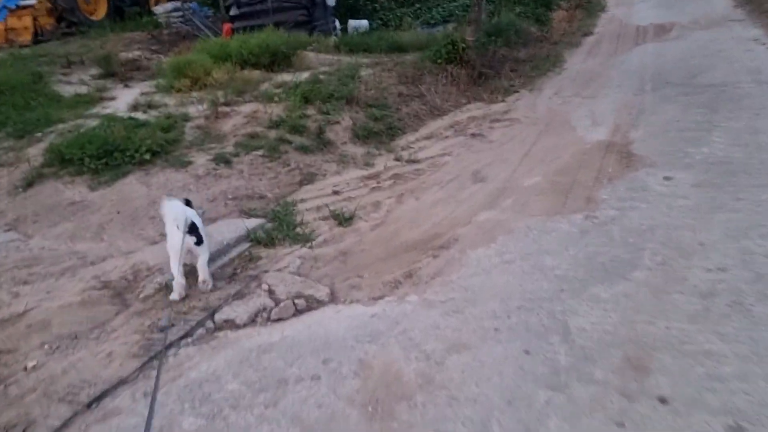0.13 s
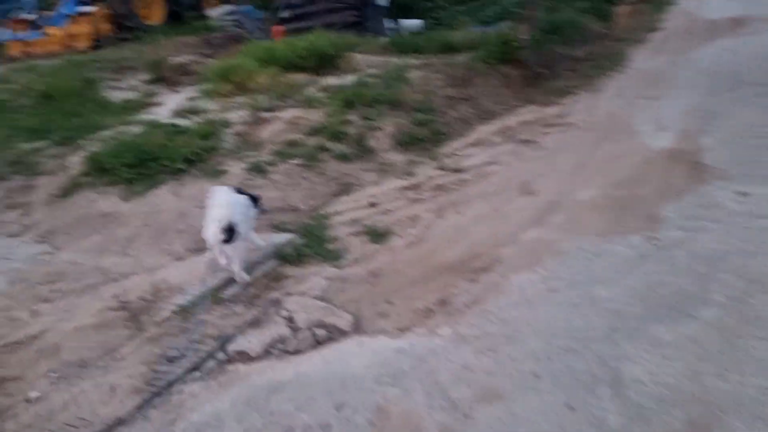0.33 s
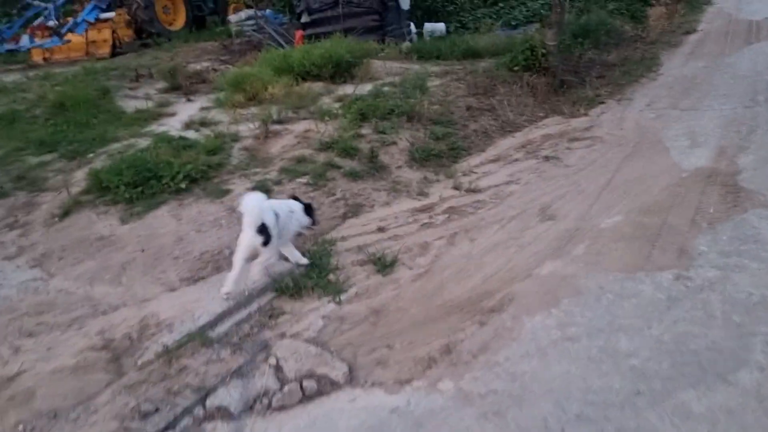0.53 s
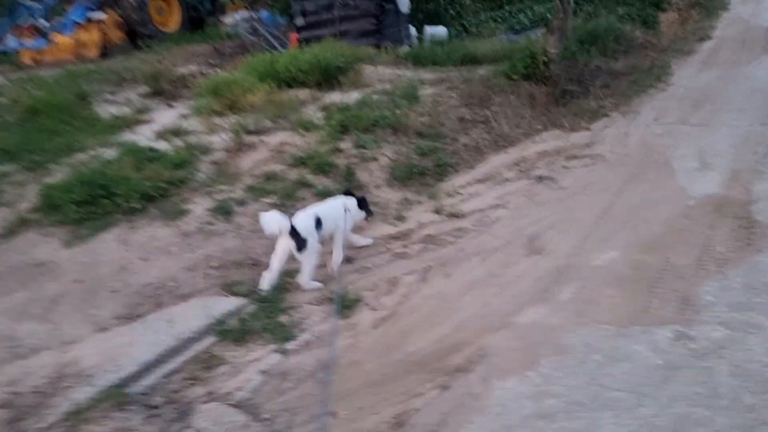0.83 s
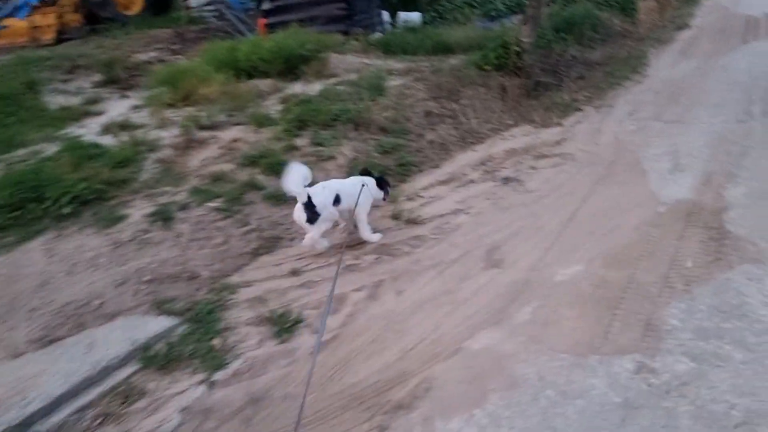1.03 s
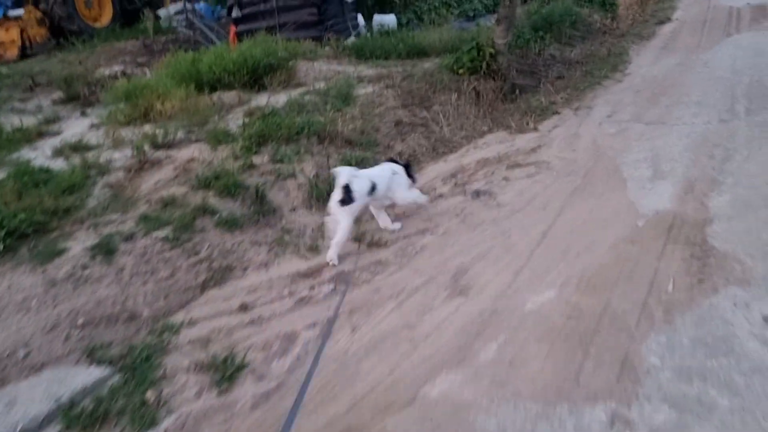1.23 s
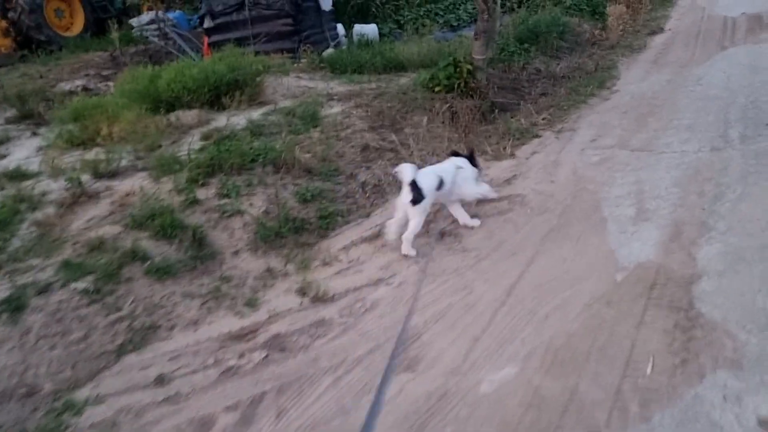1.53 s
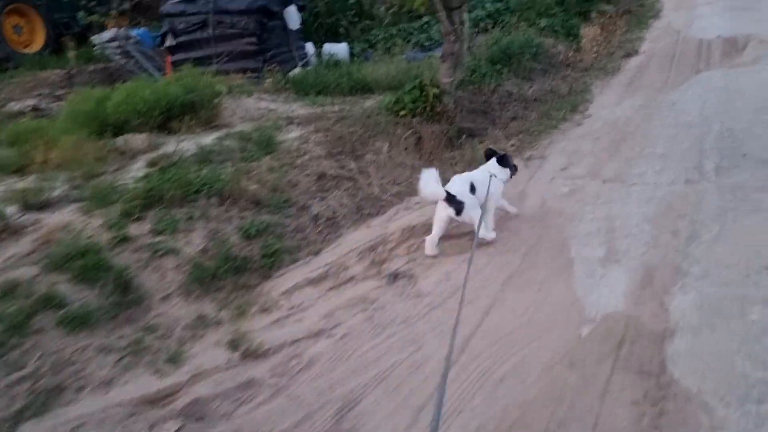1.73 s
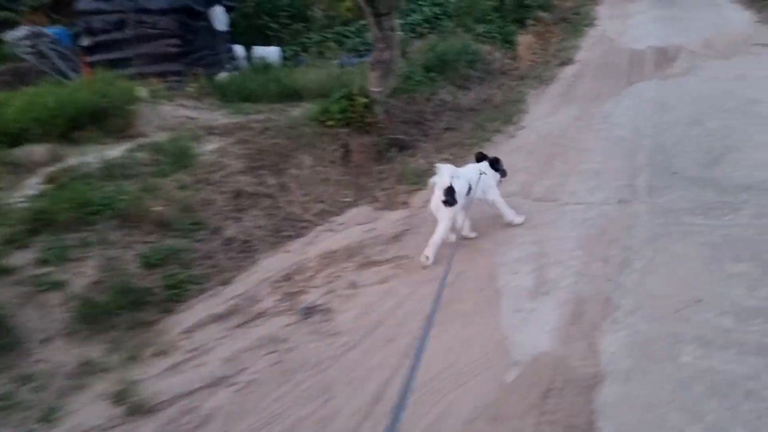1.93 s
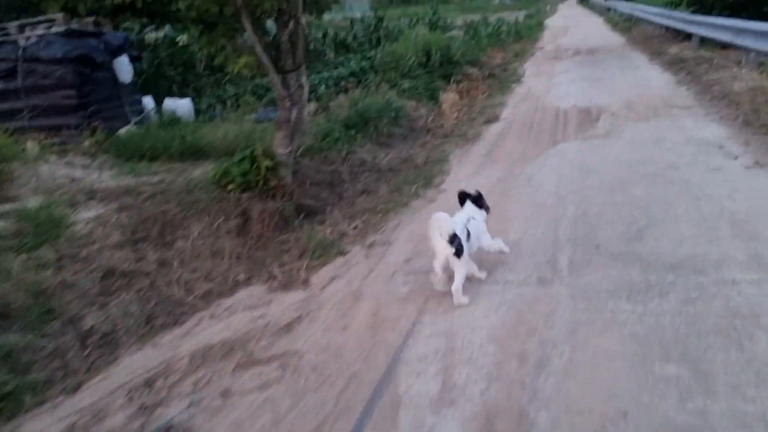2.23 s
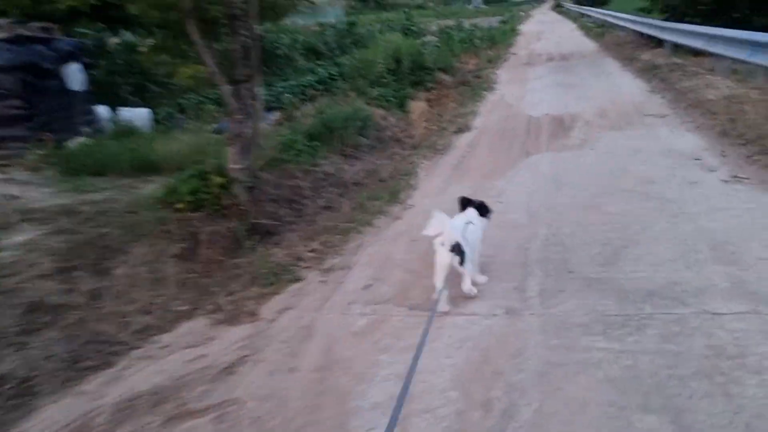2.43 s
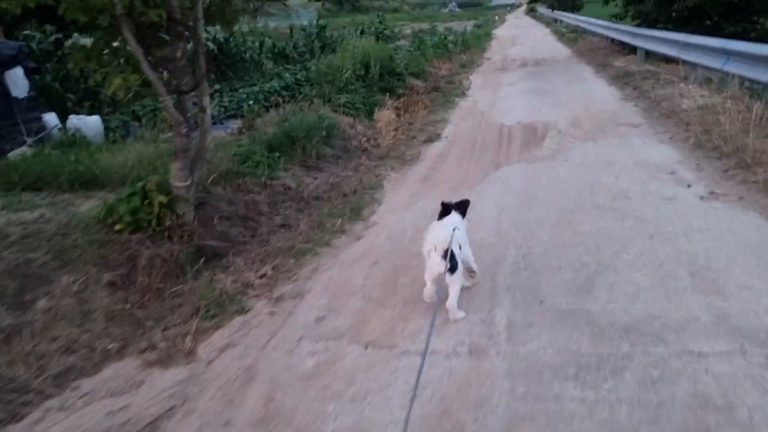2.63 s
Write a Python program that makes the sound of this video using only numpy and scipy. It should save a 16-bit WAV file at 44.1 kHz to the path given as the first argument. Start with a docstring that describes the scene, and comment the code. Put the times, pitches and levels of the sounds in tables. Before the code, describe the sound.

Loose sandals slap and scuff on a sandy concrete lane while a leash clip clicks and jingles

```python
"""Loose sandals slap and scuff along a sandy concrete lane, on a walk with a small dog.
Each slap is a noisy contact filtered into hollow, knock, crack, snap and fizz; grit cracks under the soles.
The leash's metal clip clicks, chatters and rattles through decaying modes, with one faint lower ring.
Close steps and clicks scatter briefly; wind rumbles on the microphone's two ports over a quiet outdoor hush."""
import sys
import numpy as np
from scipy import signal
from scipy.fft import rfft, irfft
from scipy.io import wavfile
from scipy.ndimage import uniform_filter1d

SR = 44100
rng = np.random.default_rng(int(sys.argv[2]) if len(sys.argv) > 2 else 0)


def dump(signal):
    """Clip the signal to [-1, 1] and save it as 16-bit WAV at the path in sys.argv[1]."""
    limited = np.clip(np.atleast_2d(signal).T, -1, 1)
    pcm = np.round(limited * 32767).astype(np.int16)
    wavfile.write(sys.argv[1], SR, pcm)


N = 121275
T = np.arange(N) / SR
HIT_T = T[:SR // 25]  # 40 ms, room for one contact
RING_T = T[:SR // 4]  # 250 ms, room for one ring

# leash clip clicks: t/s, level/dB in each of the four click bands (low to high), ring level/dB before trim
CLIP_CLICKS = [(0.182, -80, -51.5, -71, -58.5, -59.5), (0.2029, -43, -37, -42, -52, -66),
               (0.5057, -48, -40.5, -33.5, -69, -51), (0.6968, -62, -84, -44, -60, -65),
               (0.7055, -63, -67, -49.5, -62, -80), (1.219, -43.5, -41.5, -42, -42.5, -64),
               (1.2975, -53, -48, -39.5, -52, -53.5), (1.3028, -61, -52, -47.5, -46, -48),
               (1.4683, -51, -76, -41.5, -56, -55), (1.8703, -78, -77, -53, -51.5, -55.5),
               (1.883, -58, -54, -55, -49.5, -85), (2.2554, -57, -44, -67, -57, -55.5),
               (2.2747, -56, -48.5, -48.5, -52, -65), (2.4495, -44, -43, -35.5, -49.5, -59),
               (2.6451, -65, -80, -52.5, -59, -71)]

CLICK_RISE_S = 0.0003
GRIT_DECAY_S, GRIT_SPREAD = 0.001, 1.4
GRIT_LAG_S = -0.00007  # negative: the right port hears it first


def undb(db):
    """Decibels to gain."""
    return 10 ** (np.asarray(db) / 20)


def unit(x):
    """Scale each channel to rms 1."""
    return x / np.sqrt(np.mean(x ** 2, axis=-1, keepdims=True) + 1e-20)


def band(x, lo_hz, hi_hz, order=2):
    """Causal band-pass."""
    top_hz = min(max(hi_hz, lo_hz + 20), SR / 2 - 1000)
    sos = signal.butter(order, [lo_hz, top_hz], "band", fs=SR, output="sos")
    return signal.sosfilt(sos, x)


def colour(x, points):
    """Shape a full-length signal's spectrum by (f/Hz, level/dB) points, at rms 1."""
    hz, db = np.array(points, float).T
    log_hz = np.log(np.fft.rfftfreq(N, 1 / SR) + 1)
    gain = undb(np.interp(log_hz, np.log(hz), db))
    return unit(irfft(rfft(x) * gain, N))


def walk(rate):
    """Smooth random wander, spread near 1, with this many new values a second."""
    k = int(SR / rate)
    steps = np.repeat(rng.standard_normal(N // k + 1), k)
    return unit(uniform_filter1d(steps, k)[:N])


def pan(db):
    """Left and right gains for a left minus right level difference."""
    gains = undb(np.array([[db], [-db]]) / 2)
    return gains / np.sqrt(np.mean(gains ** 2))


def add(out, start, sound, lag):
    """Mix in a stereo sound that reaches the right port later by lag seconds."""
    for channel in range(2):
        i = max(int(start * SR) + channel * int(round(lag * SR)), 0)
        part = sound[channel, :max(N - i, 0)]
        out[channel, i:i + len(part)] += part


def swell(start, length, attack):
    """A straight rise and fall; attack is the rising share of the length."""
    return np.interp((T - start) / length, [0, np.clip(attack, 0.02, 0.9), 1], [0, np.sqrt(2), 0])


def at_level(x, db):
    """Set a 40 ms contact's energy to that of 10 ms at this rms level."""
    return unit(x) * undb(db) / 2


def contact(decay, spread, own, rise):
    """Surfaces close in a short crumple with one sharp peak, partly different at each port."""
    noise = rng.standard_normal((3, len(HIT_T)))
    envelope = np.exp(-HIT_T / decay) * (1 - np.exp(-HIT_T / rise))
    push = (noise[0] + own * noise[1:]) * envelope
    # spread sizes the crumple against the peak of 1
    push *= spread / np.sqrt(np.sum(push ** 2, axis=1, keepdims=True))
    push[:, int(rise * SR)] += 1
    return push


def sandals():
    """Each slap rings the air pocket under the heel and cracks in the rubber above it."""
    # sandal slaps: t/s, hollow f/Hz, crack f/Hz, then hollow, knock, crack, snap, fizz level/dB
    slaps = [(0.236, 727, 2700, -23, -19, -21, -22.5, -38),
             (0.7559, 552, 2730, -29.5, -33, -35, -38, -44.5),
             (1.0777, 780, 3280, -34, -33, -33.5, -40.5, -46), (1.2911, 525, 2790, -43, -39, -39, -51, -56),
             (1.6651, 546, 2590, -33, -37, -30, -37, -45), (1.9851, 824, 3400, -28.5, -35, -28, -30, -43.5),
             (2.4181, 560, 2700, -32, -35, -35, -40.5, -56.5)]
    # left minus right of those five parts: level/dB
    slap_pan_db = [3, -3, 7, -4, 1]
    out = np.zeros((2, N))
    for start, hollow_hz, crack_hz, *levels in slaps:
        push = contact(decay=0.0026, spread=1.38, own=0.97, rise=0.0005)
        pocket = band(push, hollow_hz * 0.83, hollow_hz * 1.174, order=1)
        hollow = band(pocket, hollow_hz * 0.63, hollow_hz * 1.75)
        knock = band(push, 950, 1800)
        crack = band(push, crack_hz * 0.84, crack_hz * 1.15, order=3)
        snap = band(push, 3700, 5900, order=3)
        fizz = band(push, 6300, 12500)
        parts = [hollow, knock, crack, snap, fizz]
        for part, db, side_db in zip(parts, levels, slap_pan_db):
            add(out, start, at_level(part, db) * pan(side_db), lag=0.00022)
    return out


def grains(rate, scatter_db, own):
    """Random tiny impacts of scattered size, partly different at each port."""
    size_db = scatter_db * np.minimum(rng.exponential(size=N), 4)
    hits = (rng.random(N) < rate / SR) * undb(size_db)
    chance = rng.standard_normal((3, N))
    return hits * (np.sign(chance[0]) + own * chance[1:])


def sand_grains(rate, scatter_db, own):
    """Grains of four sizes, each size crumpling briefly in its own band."""
    # grain sizes, coarse to fine: low f/Hz, high f/Hz
    grain_bands = [(300, 1800), (1800, 3600), (3600, 7000), (7000, 16000)]
    # tone of the sand: f/Hz, level/dB
    sand_colour = [(300, -18), (900, 6), (1500, 8), (2800, 6), (5500, -2), (8000, -0.5), (11000, -31),
                   (15500, -24)]
    sand = np.zeros((2, N))
    for lo, hi in grain_bands:
        impacts = grains(rate, scatter_db, own)
        crumple = contact(GRIT_DECAY_S, GRIT_SPREAD, own, CLICK_RISE_S)
        crackle = signal.fftconvolve(impacts, crumple, axes=1)[:, :N]
        sand += band(crackle, lo, hi)
    return colour(sand, sand_colour)


def scuffs(attack=0.22, own=0.56):
    """Crackling sand and a dull rub swell and fade as a sole slides."""
    # soles scuffing on sand: t/s, length/s, sand level/dB, sole rub level/dB
    slides = [(0.222, 0.043, -43.5, -48), (0.257, .13, -53.5, -56.5), (0.473, 0.11, -56.5, -62.5),
              (0.593, 0.079, -72, -58.5), (0.706, 0.17, -59.5, -53), (0.872, 0.27, -65.5, -67),
              (1.069, 0.044, -46, -50.5), (1.138, 0.07, -58.5, -60), (1.178, 0.14, -50.5, -57.5),
              (1.277, 0.17, -61.5, -64.5), (1.652, 0.093, -50.5, -52.5), (1.73, 0.28, -53, -55.5),
              (1.995, 0.038, -52, -52.5), (2.02, 0.33, -61.5, -63.5), (2.19, .04, -42, -52.5),
              (2.221, 0.098, -53, -60), (2.305, 0.14, -60.5, -77), (2.431, 0.054, -54.5, -56),
              (2.609, 0.11, -64.5, -83), (2.675, 0.086, -56.5, -52)]
    # tone of the sole rub: f/Hz, level/dB
    rub_colour = [(100, -11), (280, -1.5), (480, -2), (750, -2.5), (1100, -14.5), (2500, -51)]
    sand_level = sum(swell(start, length, attack) * undb(db) for start, length, db, _ in slides)
    rub_level = sum(swell(start, length, attack) * undb(db) for start, length, _, db in slides)
    sand = sand_grains(rate=900, scatter_db=3.8, own=own) * pan(db=-6)  # more to the right
    noise = rng.standard_normal((3, N))
    rub = colour(noise[0] + own * noise[1:], rub_colour)
    return sand * sand_level + rub * rub_level


def clicks(rows, decay, spread):
    """Tiny hard contacts, each with its own brightness."""
    # click bands: low f/Hz, high f/Hz
    click_bands = [(800, 2100), (2100, 3700), (3700, 6800), (7000, 15500)]
    # left minus right in each band: level/dB
    click_pan_db = [-4.5, -2, 0, -5.5]
    out = np.zeros((2, N))
    for row in rows:
        push = contact(decay, spread, own=0.9, rise=CLICK_RISE_S)
        # zip stops after the four bands, leaving out any ring level
        for (lo, hi), db, side_db in zip(click_bands, row[1:], click_pan_db):
            part = at_level(band(push, lo, hi, order=4), db)
            add(out, row[0], part * pan(side_db), GRIT_LAG_S)
    return out


def grit_cracks():
    """Grit cracks underfoot in very short contacts."""
    # grit cracking underfoot: t/s, level/dB in each of the four click bands
    cracks = [(0.0526, -62, -65, -52, -59.5), (0.2777, -53, -56, -62, -70), (0.6118, -62.5, -77, -53, -85),
              (1.0991, -50, -50, -70, -75), (1.15, -49, -62, -69, -81), (1.1585, -50, -42.5, -43.5, -67),
              (1.1889, -48, -47, -76, -71), (1.1954, -51.5, -51.5, -53, -56),
              (1.4331, -50, -51.5, -56.5, -67), (1.8435, -48.5, -49, -64, -67),
              (1.9461, -49, -53, -76, -67), (2.1021, -50.5, -55, -61, -75), (2.1185, -48, -44.5, -45, -70),
              (2.1273, -48, -50.5, -37, -59), (2.1495, -62, -49, -58, -62), (2.1695, -53, -65, -51, -67),
              (2.1769, -51, -45, -45, -70), (2.1956, -48, -53, -57, -75), (2.2041, -48, -41.5, -52, -72),
              (2.2126, -49, -37.5, -45, -71), (2.2366, -50, -37.5, -44.5, -61),
              (2.2408, -52, -51, -36, -53)]
    return clicks(cracks, GRIT_DECAY_S, GRIT_SPREAD)


def clip_clicks():
    """The leash clip knocks in short, hard contacts."""
    return clicks(CLIP_CLICKS, decay=0.0015, spread=2.2)


def metal(push):
    clip_modes = [(5400, -15, .025), (6400, -13, .025), (9400, -8, .05), (9460, -4, .08), (15160, -3, .1),
                  (15220, -2, .11), (15420, -8, .045)]
    total = np.zeros(push.shape)
    for hz, db, t60 in clip_modes:
        mode = np.sin(2 * np.pi * hz * RING_T) * np.exp(-np.log(1000) * RING_T / t60)
        ring = signal.fftconvolve(push, [mode])[:, :push.shape[1]]
        total += undb(db) * unit(ring)
    return unit(total)


def jingle(ring_trim_db=-6, rattle_trim_db=-2, rattle_ring_db=-8):
    # swivel rattles: t/s, length/s, level/dB before trim
    rattles = [(.21, 0.034, -56), (0.307, .04, -63), (0.394, 0.027, -62), (0.667, 0.067, -61),
               (1.174, 0.25, -56.5), (1.615, 0.12, -57.5), (2.17, 0.11, -53), (2.222, 0.2, -56.5),
               (2.435, 0.033, -53), (2.532, 0.0082, -55.5), (2.61, 0.036, -54)]
    # tone of the rattle: f/Hz, level/dB
    rattle_colour = [(1500, -28), (5000, 6), (8000, -12.5), (12000, -7), (15500, 5)]
    chatter_per_s, chatter_s = 1500, 0.006
    out = np.zeros((2, N))
    for row in CLIP_CLICKS:
        struck = rng.random(len(RING_T)) < chatter_per_s / SR
        bounces = struck * rng.standard_normal((2, len(RING_T)))
        chatter = bounces * RING_T * np.exp(-RING_T / chatter_s)
        add(out, row[0], metal(chatter) * undb(row[-1] + ring_trim_db), GRIT_LAG_S)
    loose = grains(rate=6000, scatter_db=5.5, own=1)
    level = sum(swell(start, length, attack=0.22) * undb(db + rattle_trim_db)
                for start, length, db in rattles)
    rattle = colour(loose, rattle_colour) + undb(rattle_ring_db) * metal(loose)
    return out + level * rattle


def ping(start=0.527, upper_hz=2099, lower_hz=1039, lower_db=-9, rise=0.0027, decay=0.028):
    """One faint, lower ring of two decaying sines just after a jingle."""
    t = np.maximum(T - start, 0)
    upper = np.sin(2 * np.pi * upper_hz * t)
    lower = undb(lower_db) * np.sin(2 * np.pi * lower_hz * t)
    envelope = (1 - np.exp(-t / rise)) * np.exp(-t / decay)
    return 2 * undb(-56) * (upper + lower) * envelope


def scatter(near, level_db=-17, decay=0.01, rise=0.00067):
    """Rough ground and the walker reflect close sounds as a short, decaying spray of noise."""
    t = T[:SR // 5]
    noise = band(rng.standard_normal((2, len(t))), 140, 5600, order=1)
    tail = noise * np.exp(-t / decay) * (1 - np.exp(-t / rise))
    tail *= undb(level_db) / np.sqrt(np.sum(tail ** 2, axis=1, keepdims=True))
    return signal.fftconvolve(near, tail, axes=1)[:, :N]


def stray_grains(level_db=-69):
    """Faint single grains shift throughout the walk."""
    return undb(level_db) * sand_grains(rate=40, scatter_db=4.5, own=0.65)


def wind(buffet_db=2.5):
    """Air buffets each microphone port separately, mostly the left one more."""
    # wind on the microphone: t/s, level/dB, left minus right level/dB
    gusts = [(0.0, -45, 8), (0.15, -58, 2), (0.33, -47.5, 7), (0.44, -55.5, -3), (0.55, -42, 14),
             (0.73, -48, 7.5), (0.88, -41, 10.5), (1.04, -49, 9), (1.16, -38, 4.5), (1.22, -48, 10),
             (1.51, -49, 4), (1.59, -51.5, 11), (1.86, -36, 8.0), (2.17, -63, -13), (2.33, -41.5, -7),
             (2.37, -45, 7.5), (2.73, -44.5, 8.5), (2.75, -53, 2.0)]
    # tone of the rumble: f/Hz, level/dB
    wind_colour = [(20, -12.5), (40, -7.5), (62, 0), (85, -2), (115, -13), (170, -20.5), (300, -34.5),
                   (700, -65)]
    times, level_db, side_db = np.array(gusts).T
    ports = []
    for side in (1, -1):  # left, right
        gust_db = np.interp(T, times, level_db + side * side_db / 2)
        rumble = colour(rng.standard_normal(N), wind_colour)
        ports.append(rumble * undb(gust_db + buffet_db * walk(rate=13.12)))
    return np.array(ports)


def hush(level_db=-60.5, width=1):
    """Quiet, even open-air background of wide, coloured noise."""
    # tone of the open air: f/Hz, level/dB
    hush_colour = [(30, -6), (150, -13), (350, -5), (1000, -10), (2500, -16.5), (6800, -20), (8500, -30),
                   (13000, -30), (15500, -28)]
    mid, side = colour(rng.standard_normal((2, N)), hush_colour)
    air = np.array([mid + width * side, mid - width * side])
    return unit(air) * undb(level_db)


def scene():
    """Steps and leash with a brief outdoor scatter, over wind and hush."""
    near = sandals() + grit_cracks() + clip_clicks()
    steps = near + scatter(near) + scuffs()
    leash = jingle() + ping()
    return steps + leash + stray_grains() + wind() + hush()


def record(dry):
    """The recorder cuts the top with a steep low-pass at 16 kHz."""
    low_pass = signal.ellip(10, 0.2, 80, 16000, fs=SR, output="sos")
    return signal.sosfilt(low_pass, dry)


dry = scene()
out = record(dry)
dump(out)
```